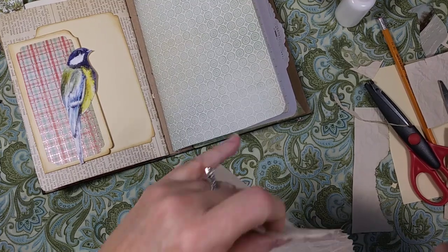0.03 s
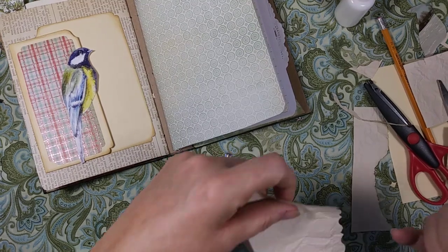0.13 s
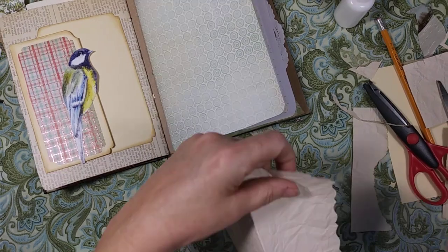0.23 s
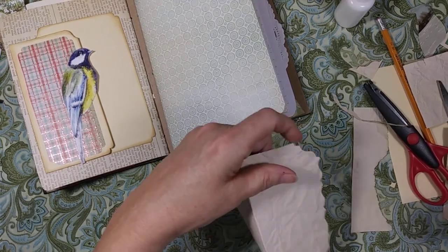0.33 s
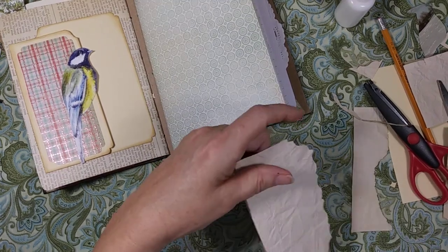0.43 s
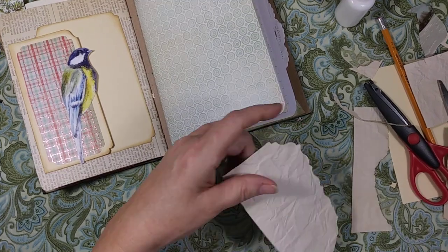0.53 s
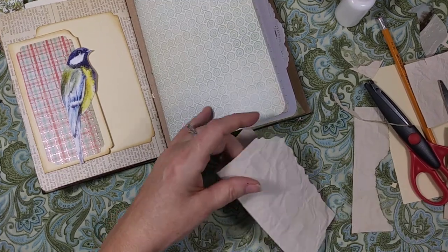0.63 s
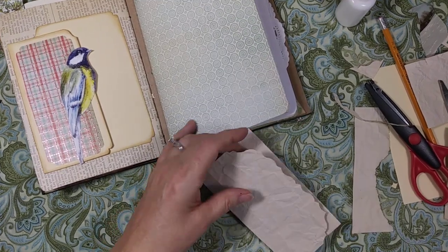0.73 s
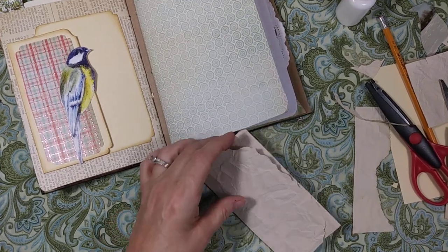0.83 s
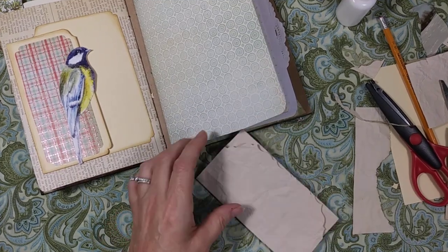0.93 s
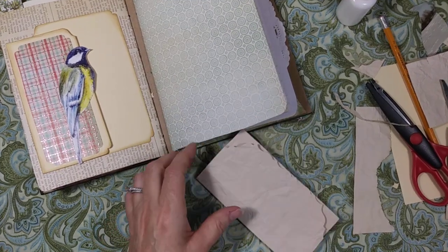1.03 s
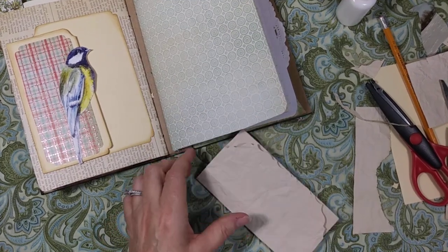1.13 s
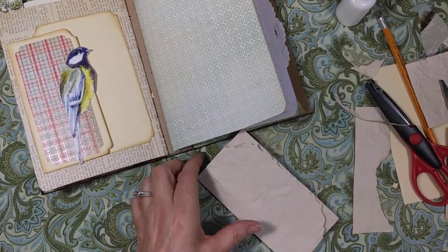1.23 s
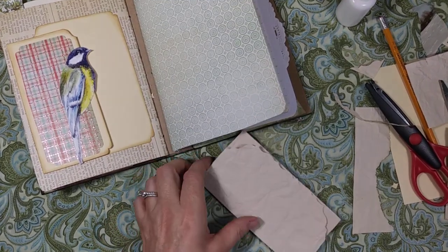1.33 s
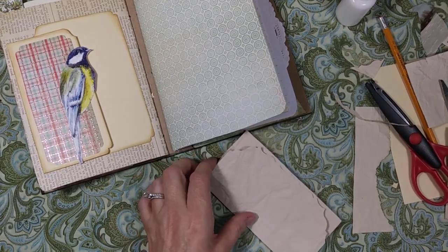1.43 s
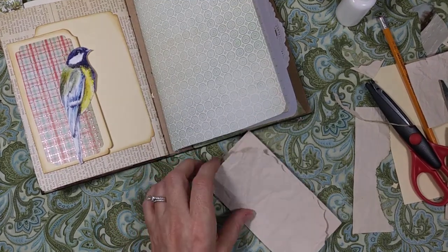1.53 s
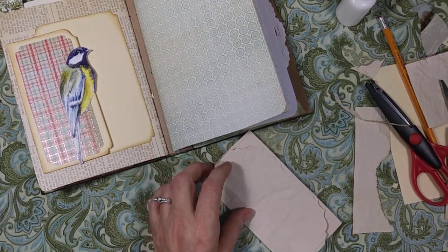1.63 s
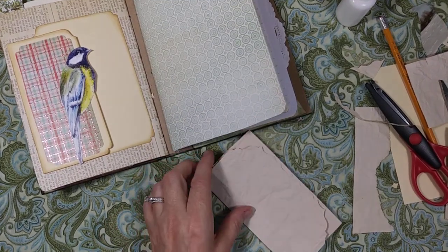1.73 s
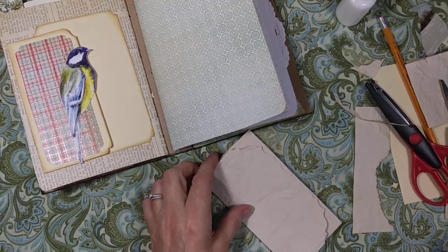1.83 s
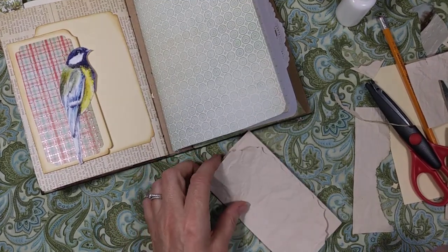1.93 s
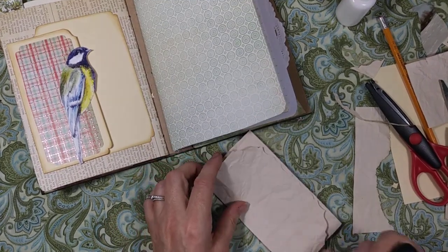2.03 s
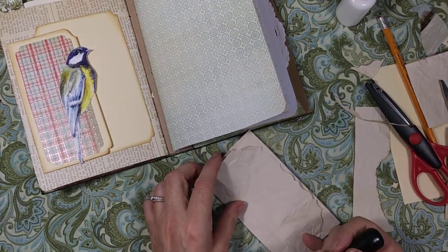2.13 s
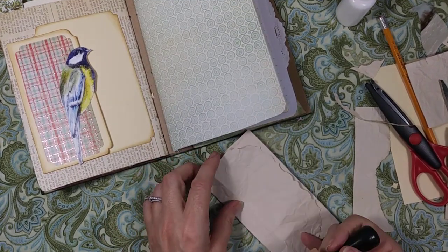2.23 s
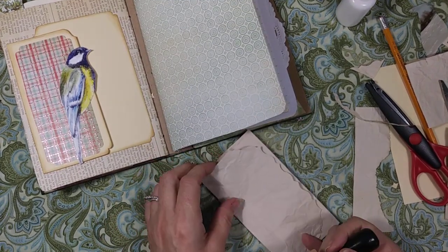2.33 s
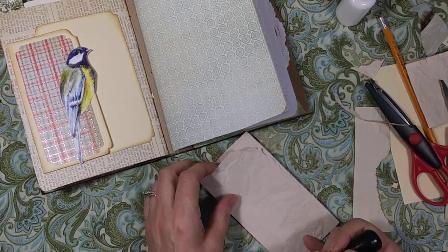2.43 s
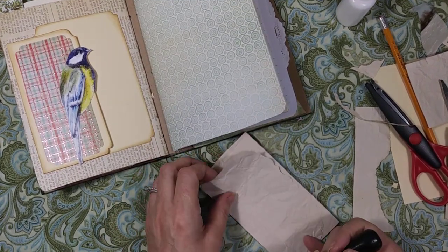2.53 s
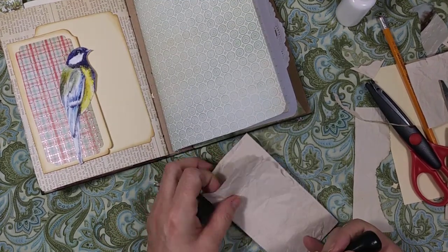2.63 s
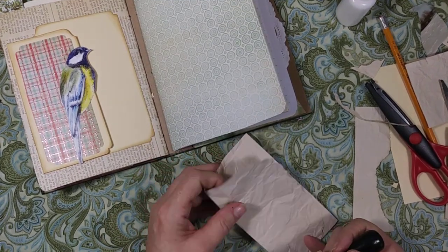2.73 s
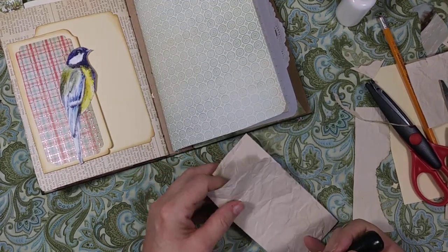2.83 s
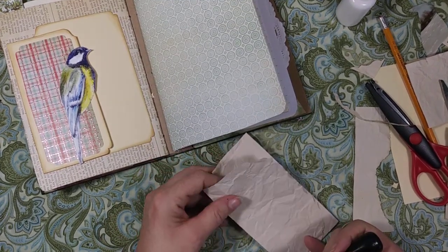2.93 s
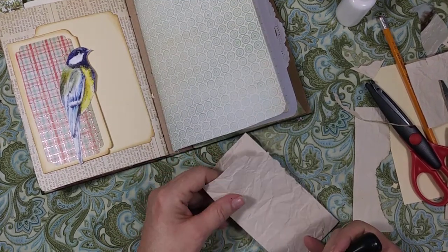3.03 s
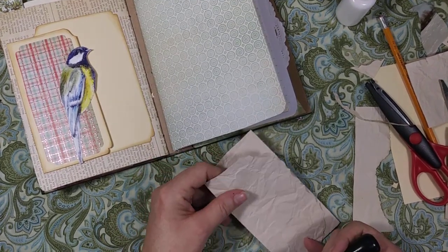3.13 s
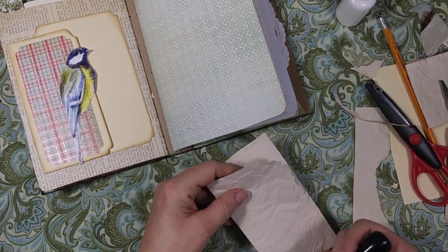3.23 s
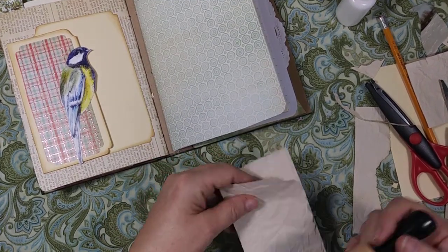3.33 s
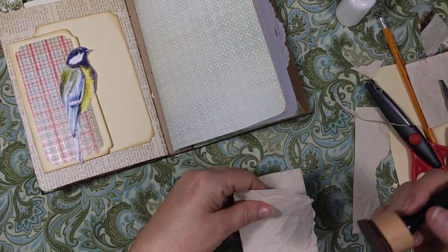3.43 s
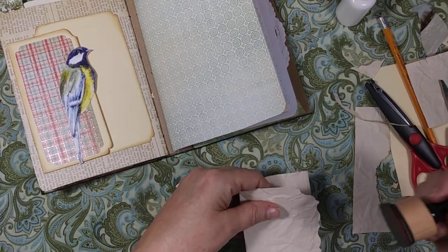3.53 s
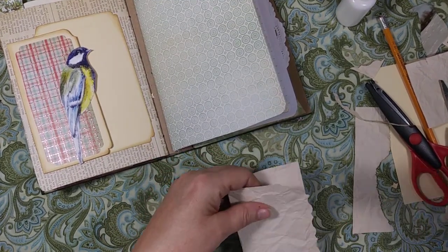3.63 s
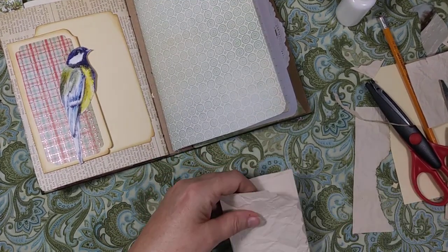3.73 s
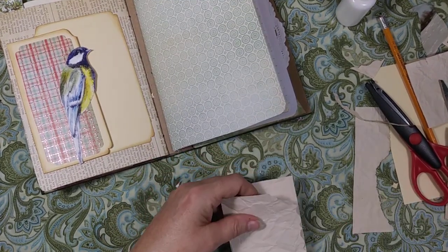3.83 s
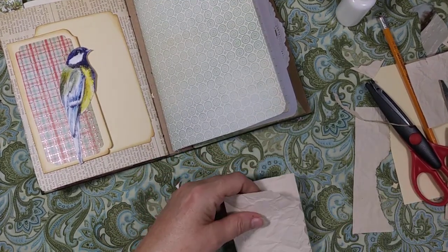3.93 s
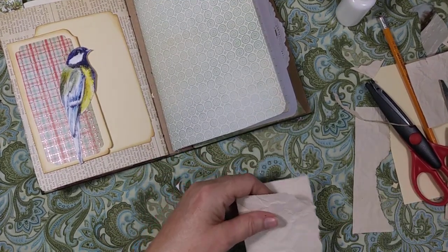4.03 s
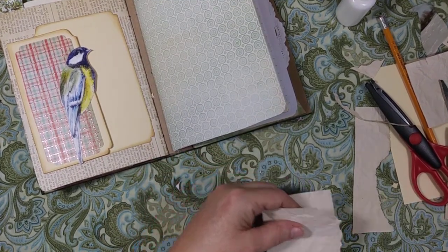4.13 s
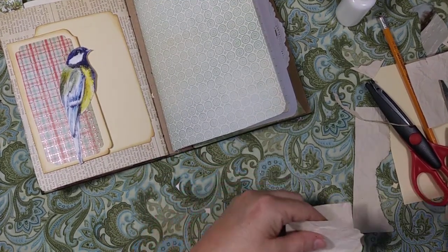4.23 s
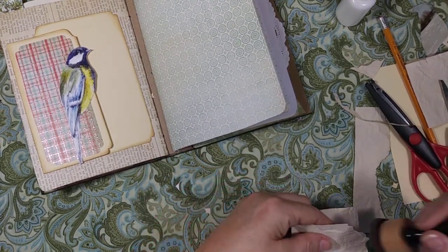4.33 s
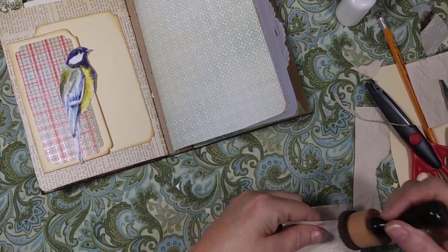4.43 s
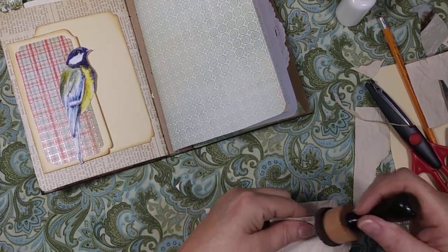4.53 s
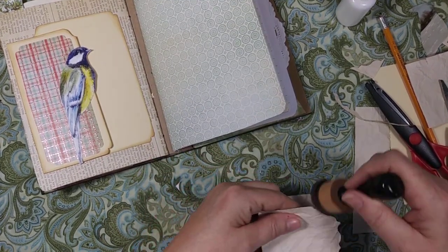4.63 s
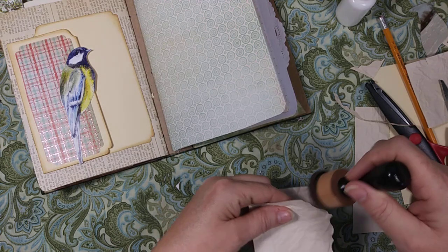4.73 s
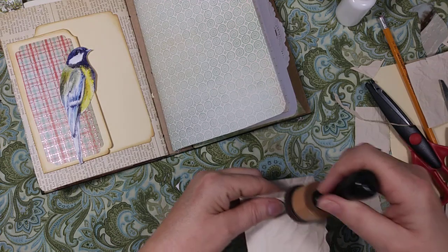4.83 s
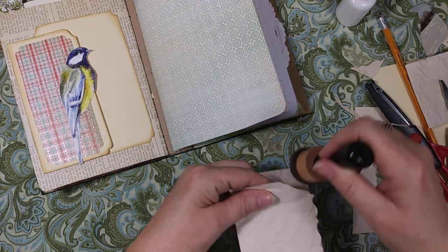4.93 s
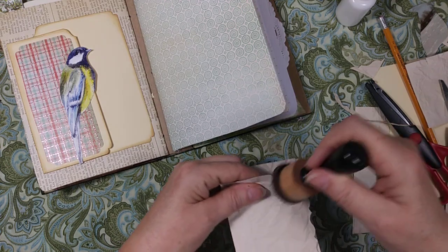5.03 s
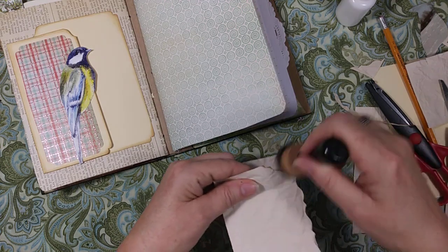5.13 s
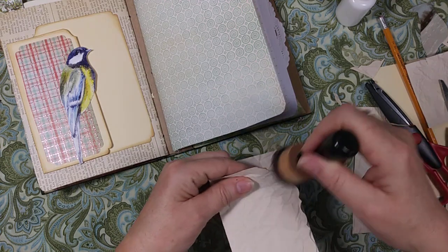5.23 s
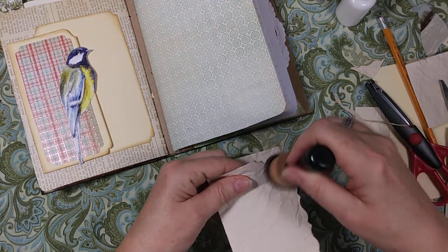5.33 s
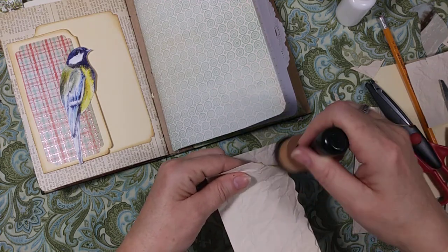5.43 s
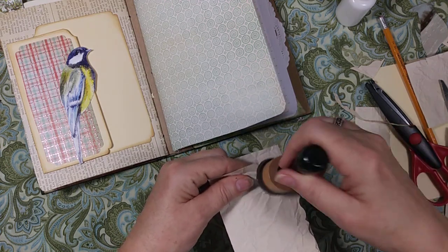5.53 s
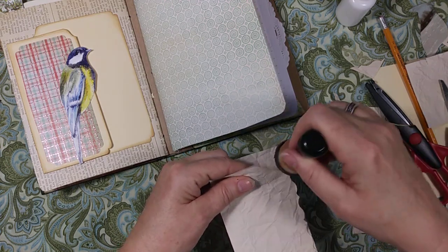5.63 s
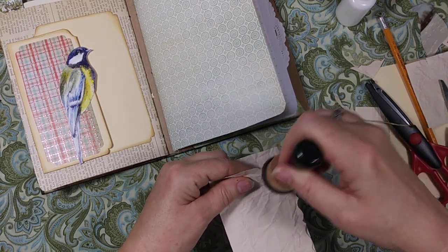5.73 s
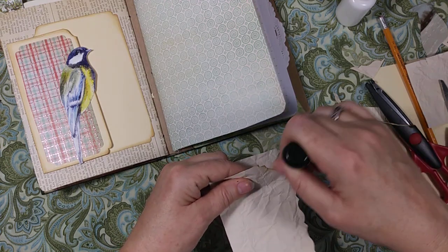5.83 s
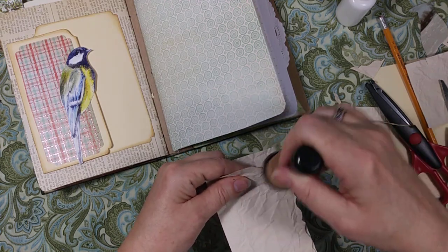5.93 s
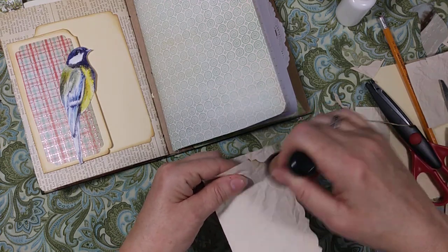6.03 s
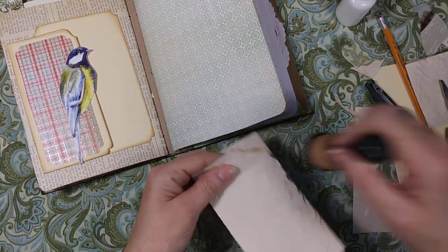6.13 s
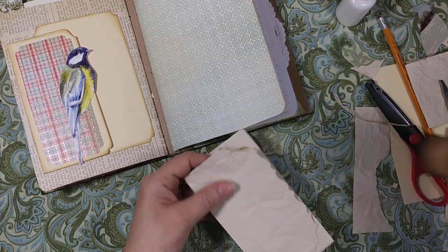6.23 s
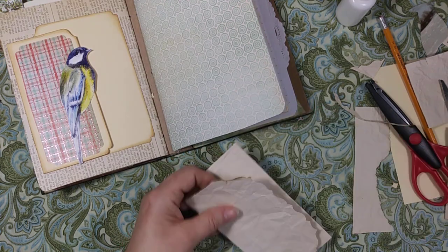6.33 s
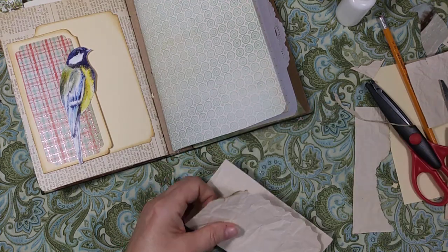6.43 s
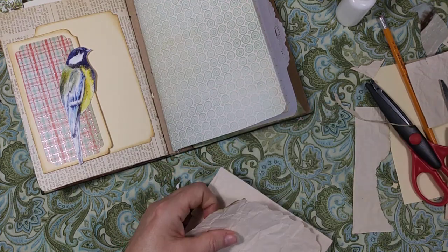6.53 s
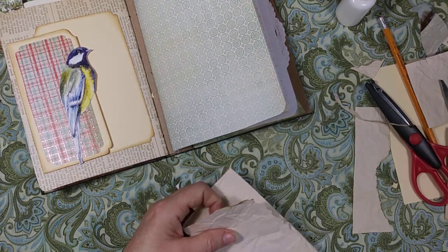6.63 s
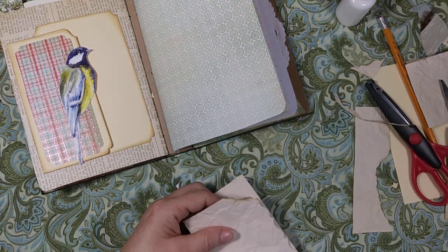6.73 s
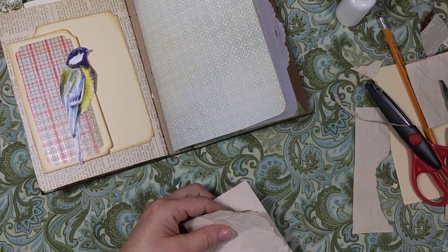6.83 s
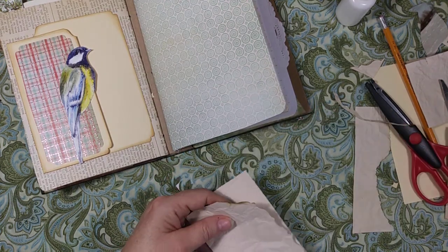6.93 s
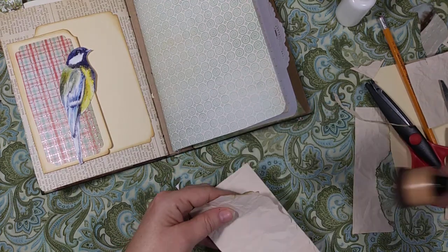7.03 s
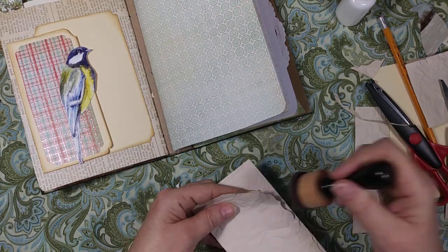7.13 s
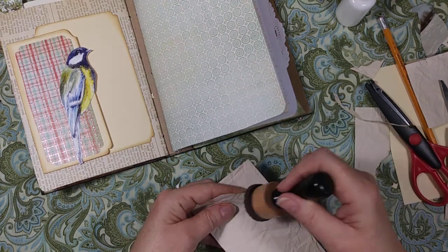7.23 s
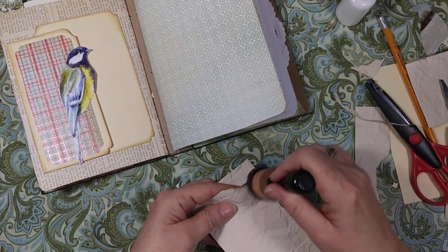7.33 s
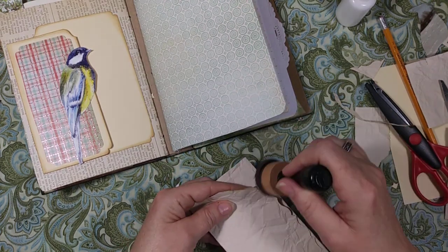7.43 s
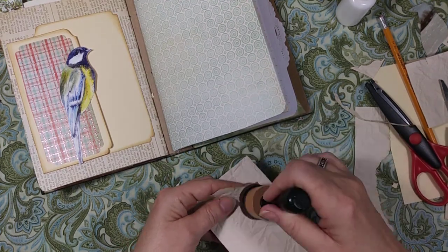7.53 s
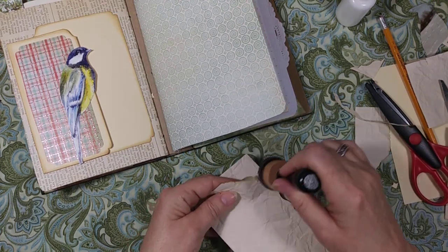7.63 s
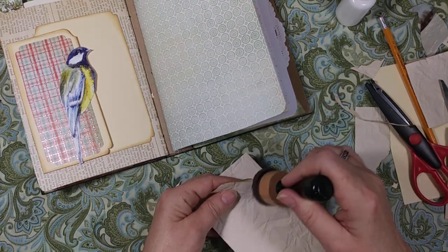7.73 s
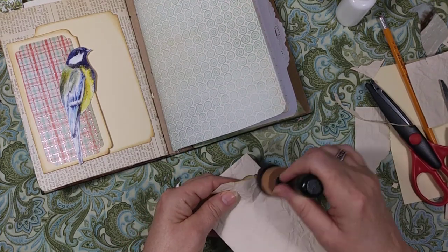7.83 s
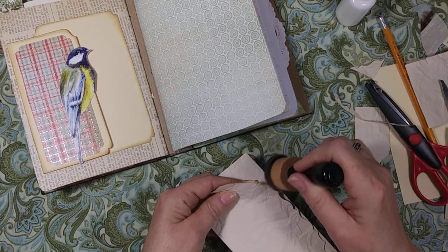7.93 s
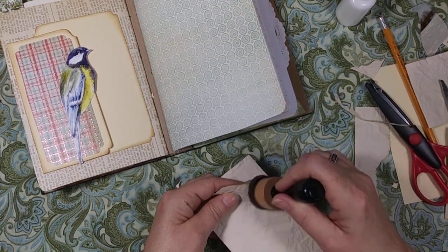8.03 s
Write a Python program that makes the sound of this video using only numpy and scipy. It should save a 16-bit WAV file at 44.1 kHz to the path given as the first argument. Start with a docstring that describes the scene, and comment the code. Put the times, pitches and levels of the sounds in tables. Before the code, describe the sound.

A strip of paper slides about on a cloth-covered table with a soft, uneven hiss and a few sharp crackles. Then a foam ink pad swipes its edge in a run of quick dry scuffs, each ending in a small papery flick. The paper is shifted again and three more swipes follow. The microphone is close, in a small, quiet room.

```python
"""A strip of paper slides about on a cloth-covered craft table, hissing as its fibres catch and let go.
Then a foam ink pad is swiped over its edge: dry scuffs that end as the bent edge flicks free.
Creases in the handled sheet crackle now and then. One microphone stands near the table in a small room;
a noise gate shuts out the room's hum between the moves."""
import sys
import numpy as np
from scipy import signal
from scipy.fft import rfft, irfft, next_fast_len
from scipy.io import wavfile
from scipy.ndimage import uniform_filter1d, map_coordinates

SR = 44100
rng = np.random.default_rng(int(sys.argv[2]) if len(sys.argv) > 2 else 0)


def int16_out(signal):
    """Quantize to a 16-bit WAV file."""
    q = np.round(np.clip(np.atleast_2d(signal).T, -1, 1) * 32767)
    wavfile.write(sys.argv[1], SR, q.astype(np.int16))


N = 356769
T = np.arange(N) / SR
MOTION_T = np.arange(0, N / SR, .001)   # coarser time grid for the hand movements

# spectra of the paper's hiss, its finest fibres and the drag on the cloth: frequency_hz, level_db
HISS_SPECTRUM = [(300, -14), (1000, -7.5), (2500, -8.5), (3800, 2.5), (5200, 2), (6600, 1), (7800, -10),
                 (9500, -19.5), (16000, -37)]
FIZZ_SPECTRUM = [(4000, -30), (7000, -1), (8000, -1), (9300, 2.5), (10700, -3), (12300, -13.5),
                 (16000, -16)]
DRAG_SPECTRUM = [(30, -47), (48, -18), (72, -9.5), (100, -5.5), (170, -6), (280, 0.5), (420, -5),
                 (800, -13), (1500, -19.5), (4000, -38.5)]
# resonances of the sliding sheet in each hold: start_s, [pitch_hz, width_hz, level_db]
SHEET_HOLDS = [(0, [(744, 28, -2.5), (1130, 290, 3.5), (2050, 420, 3), (2780, 620, 2.5)]),
               (1.12, [(1140, 540, -8), (1880, 270, 0.5), (2520, 320, 1), (3250, 320, -8)]),
               (2.75, [(662, 60, -7), (1170, 135, 2), (1770, 470, -1.5), (3480, 650, -1.5)]),
               (6.19, [(1184, 106, -0.5), (1820, 320, 0.5), (2300, 510, -6.5), (2920, 460, -2.5)])]
# resonances of the sheet on the table's rim: pitch_hz, width_hz, level_db
RIM_RESONANCES = [(557, 64, 0), (2210, 180, -2.5), (3500, 680, -15), (4440, 170, -3.5)]


def sliding_sheet():
    """Paper on cloth hisses and crinkles, its edge rasps, the hand drags dully; once it rubs the rim."""
    hiss, rasp, fizz, drag = sheet_motion()
    catches = friction(per_s=24000, spread_db=1.45, judder_db=1.8, judder_hz=85)
    fibres = from_db(-1.07) * hiss * coloured(catches, HISS_SPECTRUM)
    fibres += from_db(-3) * fizz * coloured(catches, FIZZ_SPECTRUM)
    fibres += from_db(-14.5) * hiss * crinkles(per_s=50, spread_db=5.5)
    edge = held_body(friction(per_s=9000, spread_db=2, judder_db=2.5, judder_hz=80.5), SHEET_HOLDS)
    rim = body(friction(per_s=5100, spread_db=.5, judder_db=1, judder_hz=60), RIM_RESONANCES)
    over_rim = from_db(-55) * together([stroke(3.78, 4.22, rise_s=.06, fall_s=.06)])
    cloth = coloured(rng.standard_normal(N), DRAG_SPECTRUM)
    return fibres + from_db(-1.5) * rasp * edge + drag * cloth + over_rim * rim


# the hand keeps the sheet creeping over the cloth: start_s, end_s, hiss_db, drag_db
HAND_CONTACTS = [(0, 0.21, -62.5, -60.5), (0.236, .5, -69, -58.5), (0.51, 1.051, -62, -60.5),
                 (1.16, 1.34, -82, -68), (1.406, 1.839, -63, -62), (1.88, 1.998, -74, -76),
                 (2.047, 2.112, -76, -71), (2.18, 2.623, -68, -63), (2.652, 2.746, -61.5, -60.5),
                 (2.81, 3.653, -61, -60.5), (3.68, 4.356, -60.5, -59.5), (4.409, 4.536, -64, -62.5),
                 (6.196, 7.116, -59.5, -61.5), (7.162, 7.233, -58.5, -58)]
# each push speeds the sheet up and lets it slow; a negative rise is an abrupt start:
# peak_s, rise_s, fall_s, hiss_db, rasp_relative_db, fizz_relative_db
HAND_PUSHES = [(.01, .03, .18, -50.5, -6, -8), (.168, .04, .1, -49, -4, -9),
               (.342, -0.07, .14, -46.5, 0, -2), (.405, 0.2, .04, -54, 1.5, -17.5),
               (.53, 0.24, 0.21, -56, 1, -9), (0.653, -0.04, .06, -45.5, -2.5, -9),
               (.732, 0.02, 0.06, -51, -4, -5), (.775, 0.13, .07, -54, -1, -7),
               (.849, .005, .02, -40, -10, -11), (.934, 0.1, .17, -51.5, 0.5, -8),
               (1.166, 0.12, .02, -73, 3.5, -10), (1.262, 0.1, 0.15, -74.5, 5.5, -12),
               (1.425, 0.01, 0.26, -56.5, -0.5, -8), (1.588, .015, .08, -51, 1.5, -5),
               (1.636, 0.0555, 0.0161, -45, -1.5, -6.5), (1.756, .008, .04, -47.5, -2, -4),
               (1.971, 0.08, 0.03, -53.5, -0.5, -8), (2.062, .04, 0.14, -59.5, -2.5, -11),
               (2.203, .012, .055, -47, 2.5, -13), (2.295, .06, .03, -47, 3, -3),
               (2.412, .035, 0.14, -53.5, 6.5, -12), (2.464, .04, 0.05, -48.5, -1, -6),
               (2.634, 0.06, 0.17, -49, -6.5, -12), (2.711, .07, 0.08, -42.5, -8, -12.5),
               (2.803, 0.0238, 0.09, -41.5, 0, -11), (2.89, 0.04, 0.01, -47.5, 1, -9),
               (3.088, 0.16, 0.03, -52, -0.5, -13), (3.273, 0.15, 0.04, -42.5, -5.5, -11.5),
               (3.368, 0.13, 0.4, -52.5, -19, -7.5), (3.564, -0.3, 0.16, -54.5, -5, -17),
               (3.8, .15, .13, -50, -7, -15), (4.028, -0.3, 0.2, -60, -5, -9.5),
               (4.138, -0.08, 0.09, -50, -3, -12), (4.2, 0.02, 0.0546, -48, -5, -8),
               (4.446, 0.05, 0.03, -49.5, -15, -6), (6.245, 0.0366, 0.09, -44, -20, -9),
               (6.405, -0.03, 0.24, -49.5, -12, -10.5), (6.695, 0.09, 0.18, -47.5, -6.5, -13),
               (6.816, 0.16, 0.06, -46.5, -13, -9), (6.933, 0.07, .12, -45.5, -10, -9),
               (7.05, 0.25, 0.1, -53.5, -8, -9), (7.162, 0.1, 0.09, -58, -5, -4)]
# a hand presses down with a soft bump: peak_s, level_db
HAND_PRESSES = [(.93, -53.5), (4.22, -52.5), (6.714, -46.5), (7.97, -57)]


def sheet_motion():
    """Steady hand contact with pushes and presses on top: gains of hiss, rasp, fizz and drag."""
    rubs, drags = [], []
    unevenness = rms_one(butter(rng.standard_normal(N), 17, "low"))
    pressure = from_db(1.2 * np.interp(MOTION_T, T, unevenness))
    contact_rasp_db, contact_fizz_db = -.4, -11.5   # relative to the hiss
    for start_s, end_s, hiss_db, drag_db in HAND_CONTACTS:
        contact = pressure * stroke(start_s, end_s, rise_s=.028, fall_s=.034)
        rubs.append((from_db(hiss_db) * contact, contact_rasp_db, contact_fizz_db))
        drags.append(from_db(drag_db) * contact)
    for peak_s, rise_s, fall_s, hiss_db, rasp_db, fizz_db in HAND_PUSHES:
        rubs.append((from_db(hiss_db) * stroke(peak_s, peak_s, rise_s, fall_s), rasp_db, fizz_db))
    for peak_s, level_db in HAND_PRESSES:
        drags.append(from_db(level_db) * stroke(peak_s, peak_s, rise_s=.03, fall_s=.042))
    return (*rub_gains(rubs), together(drags))


def friction(per_s, spread_db, judder_db, judder_hz):
    """Fibres catch and let go: a dense rain of tiny uneven clicks, bunched by the contact's judder."""
    caught = rng.random(N) < per_s / SR
    sizes = from_db(spread_db * np.minimum(rng.exponential(1, N), 4)) * rng.standard_normal(N)
    judder = rms_one(butter(rng.standard_normal(N), judder_hz, "low"))
    return caught * sizes * from_db(judder_db * judder)


def crinkles(per_s, spread_db):
    """Stray fibres snap as the sheet flexes, each at a pitch of its own."""
    sizes = from_db(spread_db * np.minimum(rng.exponential(1, N), 2)) * rng.choice([-1, 1], N)
    snaps = sizes * (rng.random(N) < per_s / SR)
    pitches_hz = np.geomspace(2000, 7500, 10)
    chosen = rng.integers(0, len(pitches_hz), N)
    rings = (resonate(snaps * (chosen == k) + 1e-18, hz, 300) for k, hz in enumerate(pitches_hz))
    return rms_one(sum(rings))


# spectra of the scuffing foam and the swaying strip: frequency_hz, level_db
SCUFF_SPECTRUM = [(40, -31), (150, -21), (700, -0.5), (2000, 1), (2800, 1), (4200, 2), (5700, 1),
                  (7000, -3), (8000, -24), (10000, -27), (16000, -38)]
THUD_SPECTRUM = [(40, -33), (90, -4), (170, 0), (330, 6), (550, -6), (900, -3), (3000, -49)]
# resonances of the swiped edge in each hold: start_s, [pitch_hz, width_hz, level_db]
EDGE_HOLDS = [(4.6, [(300, 78, -12.5), (452, 44, 1), (1065, 160, 3), (1640, 340, -3.5), (4100, 400, -12)]),
              (5.33, [(486, 140, -3.5), (1270, 160, 2), (1740, 200, -1.5), (3120, 220, 0)]),
              (7.3, [(457, 250, -8), (1150, 160, 1), (1710, 170, 1), (5500, 800, -5.5)])]


def pad_swipes():
    """Foam scuffs across the paper edge, sets it ringing and pushes the whole strip with a soft thud."""
    scuff, ring, fizz = pad_motion()
    catches = friction(per_s=20000, spread_db=3, judder_db=1.5, judder_hz=152)
    foam = from_db(-.96) * scuff * coloured(catches, SCUFF_SPECTRUM)
    foam += from_db(-2.5) * fizz * coloured(catches, FIZZ_SPECTRUM)
    edge = held_body(friction(per_s=5000, spread_db=1, judder_db=2, judder_hz=120), EDGE_HOLDS)
    sway_power = uniform_filter1d(scuff ** 2, size=2205, origin=1000)   # the sway outlasts the rub
    thud = np.sqrt(np.maximum(sway_power, 0)) * coloured(rng.standard_normal(N), THUD_SPECTRUM)
    return foam + ring * edge + from_db(-11) * thud


# passes of the pad over the edge:
# bite_s, slip_s, scuff_db, ring_relative_db, fizz_relative_db, graze_before_s, brush_after_s
PAD_PASSES = [(4.681, 4.715, -42, -4.5, -14, .003, 0.057), (4.943, 4.996, -44.5, -6, -12.5, 0.084, 0.086),
              (5.171, 5.225, -42, -7, -12.5, 0.06, 0.09), (5.394, 5.463, -47.5, -5, -10, 0.031, 0.059),
              (5.617, 5.702, -51, 1.5, -5.5, 0.064, 0.047), (5.859, 5.922, -51.5, 0.5, -10, .002, 0.086),
              (6.09, 6.151, -51.5, -1, -11.5, .003, 0.035), (7.392, 7.438, -48, -2, -6, 0.054, 0.055),
              (7.627, 7.715, -48, -5.5, -8, 0.046, 0.058), (7.885, 7.946, -46, -4.5, -7.5, .008, 0.075)]


def pad_motion():
    """The pad grazes, bites, presses harder, slips off and brushes on: gains of scuff, ring and fizz."""
    rubs = []
    light_fade_s, light_ring_db, light_fizz_db = .025, -3, -15   # for the graze and the brush
    for bite_s, slip_s, scuff_db, ring_db, fizz_db, graze_s, brush_s in PAD_PASSES:
        graze = from_db(-68) * stroke(bite_s - graze_s, bite_s, light_fade_s, light_fade_s)
        scuff = from_db(scuff_db) * stroke(bite_s, slip_s, rise_s=.018, fall_s=.02, growth_db=5)
        brush = from_db(-67) * stroke(slip_s, slip_s + brush_s, light_fade_s, light_fade_s, growth_db=-7.5)
        keenness_db = np.interp(MOTION_T, [bite_s, slip_s], [3.5, 0])   # most fizz at the bite
        rubs.append((scuff, ring_db, fizz_db + keenness_db))
        rubs.append((graze + brush, light_ring_db, light_fizz_db))
    return rub_gains(rubs)


# the paper edge flicks or is tapped: start_s, level_db, pitch_hz, crack_relative_db, ring_relative_db
EDGE_FLICKS = [(0.484, -26, 1124, -6.5, -4), (2.193, -35.5, 1210, 0, -8), (2.7743, -32, 685, 2, -4),
               (2.8017, -26, 1130, 4.5, -5), (2.803, -38.5, 697, -10, 6), (2.883, -27, 1040, 3.5, -22),
               (3.279, -35.5, 1140, -13, -6), (4.217, -34.5, 610, -10, -16), (4.4772, -36.5, 1070, .5, -15),
               (4.716, -32, 1100, 5, -14), (4.853, -48, 1190, -13.5, -6), (4.985, -26, 1090, -2, -16),
               (4.9914, -19.5, 1350, -18, -9), (5.219, -21.5, 1300, -9, -22), (5.383, -35, 1550, -19, -16),
               (5.457, -24, 1200, -1.5, -14), (5.604, -34, 2380, -17, -17), (5.6172, -33, 1106, -11, -5),
               (5.707, -25.5, 1150, -25, -15), (5.8565, -35.5, 1296, 1.5, -4.5),
               (5.918, -25, 1380, -6, -23), (5.9211, -25, 1010, -9, -27), (6.075, -42, 1330, -19, -6),
               (6.136, -25.5, 1100, -13, -13), (6.151, -39, 1230, 5, -21), (7.4377, -21.5, 1534, -25, -5.5),
               (7.879, -37, 1730, 1, -14)]
# modes of the held strip: pitch_hz, level_db, t60_s
STRIP_MODES = [(196, -33.5, 0.096), (316, -23.5, 0.046), (521, -17, 0.025), (1037, -16.5, 0.017),
               (1358, -12, 0.034), (1742, -25.5, 0.088), (3990, -19, 0.023)]


def flicks(pop_width_hz, crack_t60_s, crack_top_hz, ring_t60_s, lifted_s):
    """The edge springs free: a pop of a few cycles, a bright crack, and the strip's modes ringing on."""
    out, t = np.zeros(N), np.arange(SR // 8) / SR
    mode_hz, mode_db, mode_t60_s = np.transpose(STRIP_MODES)[:, :, None]
    swell = np.pi * pop_width_hz * t
    for start_s, level_db, pitch_hz, crack_db, ring_db in EDGE_FLICKS:
        envelope = swell * np.exp(1 - swell) + from_db(ring_db - 60 * t / ring_t60_s)
        pop = envelope * np.sin(2 * np.pi * pitch_hz * t)
        pop = butter(pop, .5 * pitch_hz, "high")   # so small a flap radiates little bass
        crack = butter(rng.standard_normal(len(t)), crack_top_hz, "low", order=3)
        crack = butter(crack, 1500, "high") * from_db(-60 * t / crack_t60_s)
        bend, phase = rng.uniform(-1.38, 1, (2, len(STRIP_MODES), 1))   # each flick bends the strip anew
        tones = np.sin(2 * np.pi * mode_hz * (1 + .035 * bend) * t + np.pi * phase)
        modes = np.sum(from_db(mode_db - 60 * t / mode_t60_s) * tones, axis=0)
        modes *= 1 - np.exp(-t / .00044)   # the motion spreads from the edge into the strip
        modes *= 1 if start_s > lifted_s else from_db(-7.5)   # lying on the cloth damps the strip
        flick = from_db(-3) * pop + from_db(crack_db - 5) * crack + from_db(2) * modes
        add(out, start_s, from_db(level_db) * flick)
    return out


# creases give way in the handled sheet, and just after a pad pass the strip snaps back with a small tick near 4
# kHz (5.005 s to 5.524 s, 7.44 s): start_s, level_db, pitch_hz
SHEET_CRACKLES = [(.465, -36, 4200), (.485, -34, 2500), (0.8456, -22.5, 4850), (.852, -23, 5950),
                  (.928, -34.5, 2180), (1.423, -33.5, 2480), (1.629, -28, 2900), (1.637, -27, 4160),
                  (1.87, -38.5, 8350), (1.966, -40.5, 2920), (2.16, -48, 3500), (2.302, -33, 2800),
                  (2.593, -37.5, 3500), (2.7157, -23.5, 3240), (2.776, -21.5, 2570), (2.802, -22.5, 3100),
                  (2.833, -32, 4500), (2.854, -25, 3670), (2.8908, -30, 4100), (3.05, -30, 5400),
                  (3.087, -34.5, 5500), (3.7164, -34.5, 4000), (4.025, -33.5, 4470), (5.005, -34, 3900),
                  (5.237, -25.5, 4070), (5.288, -45, 3980), (5.49, -41, 4700), (5.524, -45, 3980),
                  (7.4402, -31.5, 3940)]


def crackles(width_share, top_hz, snap_db, snap_t60_s, burst_t60_s):
    """A crease buckles or the strip snaps back: a sharp snap, then a burst that dies quickly in one resonance."""
    out, t = np.zeros(N), np.arange(SR // 8) / SR
    for start_s, level_db, pitch_hz in SHEET_CRACKLES:
        burst = rms_one(resonate(rng.standard_normal(len(t)), pitch_hz, width_share * pitch_hz))
        burst *= from_db(-60 * t / burst_t60_s)
        snap = rms_one(resonate(rng.standard_normal(len(t)), pitch_hz, width_hz=pitch_hz))
        snap *= from_db(snap_db - 60 * t / snap_t60_s)
        add(out, start_s, from_db(level_db - 9.5) * (burst + snap))
    return butter(out, top_hz, "low", order=4)


def table_echo(x, lag_s, sway, echo_db):
    """The table top throws sound back to the microphone; the delay wanders as the hands move."""
    knots_s = np.arange(0, T[-1] + 1, .25)
    wander = np.interp(T, knots_s, rng.uniform(-1.037, 1, len(knots_s)))
    delay_s = lag_s * (1 + sway * wander)
    echo = map_coordinates(x, [(T - delay_s) * SR], order=3)
    gain = from_db(echo_db)
    return (x + gain * echo) / np.hypot(1, gain)


def room(x, t60_s, wet_db, wall_hz):
    """Nearby walls return a short, dull tail."""
    t = np.arange(SR // 2) / SR
    tail = butter(rng.standard_normal(len(t)), wall_hz, "low", order=1)
    tail *= from_db(-60 * t / t60_s) * (t > .004)
    return x + from_db(wet_db) * signal.fftconvolve(x, tail / np.sqrt(np.sum(tail ** 2)))[:N]


# the room's background at the microphone: frequency_hz, level_db
HUM_SPECTRUM = [(25, -36), (38, -24), (50, -7.5), (70, -2), (110, -1), (200, 1.5), (400, -4.5), (900, -9.5),
                (2000, -13.5), (5000, -20), (9000, -27), (13000, -32.5), (16000, -29)]


def room_hum():
    """A steady low noise fills the room."""
    return coloured(rng.standard_normal(N), HUM_SPECTRUM)


def noise_gate(x, open_db, knee_db, depth_db, release_db_per_s):
    """Turns everything down as the treble sinks toward the noise; opens at once, closes a little late."""
    treble_power = uniform_filter1d(butter(x, 1820, "high") ** 2, size=400)
    treble_db = 10 * np.log10(np.maximum(treble_power, 1e-12))
    held_db = np.maximum.accumulate(treble_db + release_db_per_s * T) - release_db_per_s * T
    shut = np.clip((open_db - held_db) / knee_db, 0, 1)
    return x * from_db(-depth_db * uniform_filter1d(shut, size=256))


def stroke(start_s, end_s, rise_s, fall_s, growth_db=0):
    """Gain of one movement: rise and fall are times for 20 dB; the hold changes by growth_db up to 1."""
    before = np.maximum(start_s - MOTION_T, 0) / max(rise_s, 1e-3)
    after = np.maximum(MOTION_T - end_s, 0) / max(fall_s, 1e-3)
    fade_db = -20 * np.minimum(before + after, 10) ** 1.24   # lingers near the top, then ends faster
    return from_db(fade_db + np.interp(MOTION_T, [start_s, end_s], [-growth_db, 0]))


def together(gains):
    """Overlapping movements add in power; one gain per sample."""
    return np.interp(T, MOTION_T, np.sqrt(np.sum(np.square(list(gains)), axis=0)))


def rub_gains(rubs):
    """Turns rubs (gain, ring_relative_db, fizz_relative_db) into gains of friction, ring and fizz."""
    return (together(gain for gain, _, _ in rubs),
            together(gain * from_db(ring_db) for gain, ring_db, _ in rubs),
            together(gain * from_db(fizz_db) for gain, _, fizz_db in rubs))


def held_body(x, holds):
    """Each new hold gives the paper a new set of resonances."""
    out = np.zeros(N)
    for start_s, peaks in holds:
        out = np.where(T >= start_s, body(x, peaks), out)
    return out


def body(x, peaks):
    """Parallel resonances of alternating sign; rms 1."""
    return rms_one(sum((-1) ** k * from_db(level_db) * resonate(x, pitch_hz, width_hz)
                       for k, (pitch_hz, width_hz, level_db) in enumerate(peaks)))


def resonate(x, pitch_hz, width_hz):
    """A resonance with gain 1 at its peak."""
    radius = np.exp(-np.pi * width_hz / SR)
    feedback = [1, -2 * radius * np.cos(2 * np.pi * pitch_hz / SR), radius ** 2]
    return signal.lfilter(np.array([1, 0, -1]) * (1 - radius ** 2) / 2, feedback, x)


def coloured(x, spectrum):
    """Shapes x with a smooth spectrum; rms 1."""
    hz, db = np.transpose(spectrum)
    size = next_fast_len(N)
    bins_hz = np.maximum(np.arange(size // 2 + 1) * SR / size, 1)
    gains = from_db(np.interp(np.log(bins_hz), np.log(hz), db))
    return rms_one(irfft(rfft(x, size) * gains, size)[:N])


def butter(x, hz, kind, order=2):
    """A low- or high-pass."""
    return signal.sosfilt(signal.butter(order, hz, kind, fs=SR, output="sos"), x)


def add(out, start_s, sound):
    """Mixes a sound into out."""
    at = int(start_s * SR)
    out[at:at + len(sound)] += sound[:N - at]


def from_db(db):
    """Decibels to gain."""
    return 10 ** (np.asarray(db) / 20)


def rms_one(x):
    """Scales x to rms 1."""
    return x / np.sqrt(np.mean(x ** 2) + 1e-20)


def scene():
    """At the table: rubbing, flicks and crackles, with the small room and its hum behind them."""
    paper = table_echo(sliding_sheet() + pad_swipes(), lag_s=.00143, sway=.359, echo_db=-10)
    paper += flicks(pop_width_hz=1080, crack_t60_s=.028, crack_top_hz=6800, ring_t60_s=.04, lifted_s=4.3)
    paper += crackles(width_share=.23, top_hz=8850, snap_db=3, snap_t60_s=.0062, burst_t60_s=.024)
    heard = room(paper, t60_s=.11, wet_db=-17, wall_hz=3500) + from_db(-60) * room_hum()
    return np.array([heard, heard])


def record(dry):
    """One microphone feeds both channels through the gate; the deepest bass and the top are cut."""
    microphone = butter(dry[0], 33, "high", order=4)
    gated = noise_gate(microphone, open_db=-63.5, knee_db=5, depth_db=20, release_db_per_s=346)
    top_cut = signal.ellip(10, .2, 70, 15900, fs=SR, output="sos")
    mono = signal.sosfilt(top_cut, gated)
    return np.array([mono, mono])


dry = scene()
out = record(dry)
int16_out(out)
```